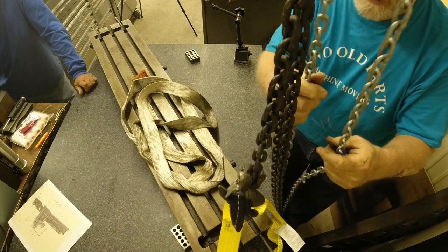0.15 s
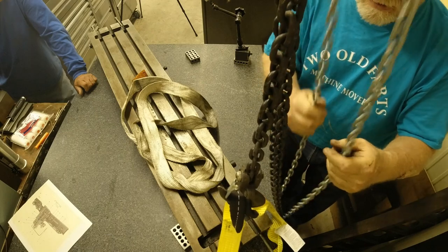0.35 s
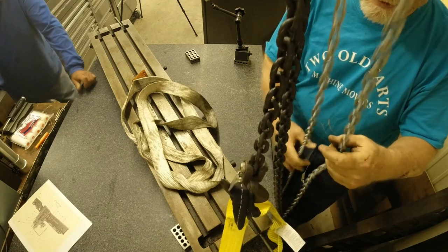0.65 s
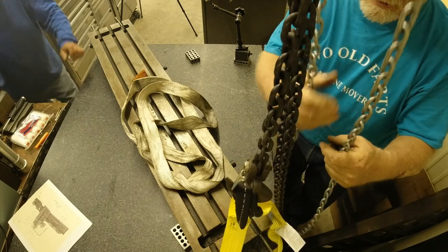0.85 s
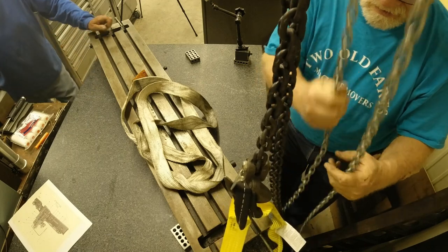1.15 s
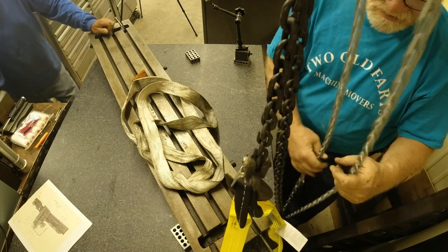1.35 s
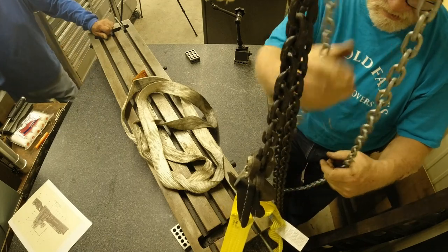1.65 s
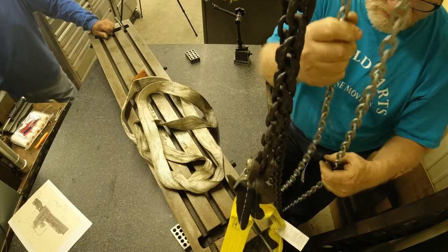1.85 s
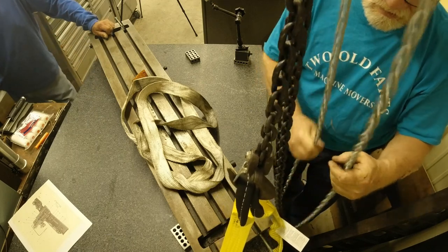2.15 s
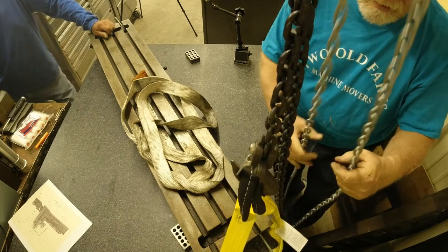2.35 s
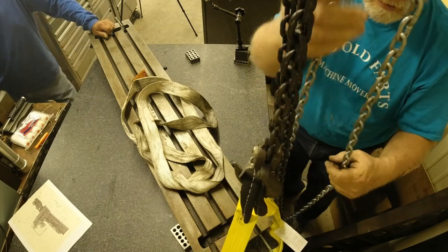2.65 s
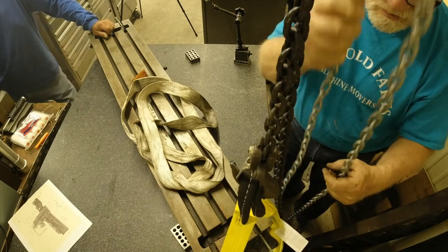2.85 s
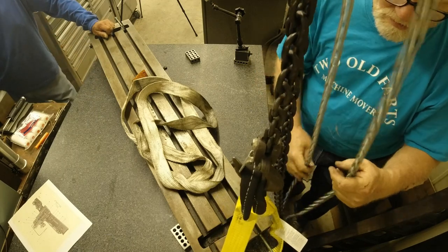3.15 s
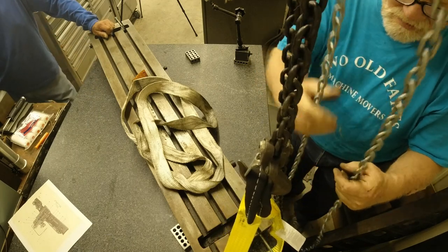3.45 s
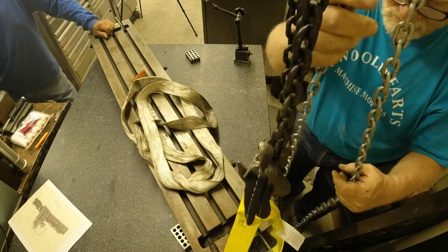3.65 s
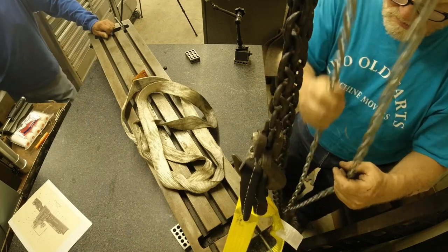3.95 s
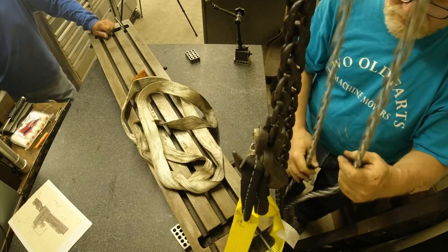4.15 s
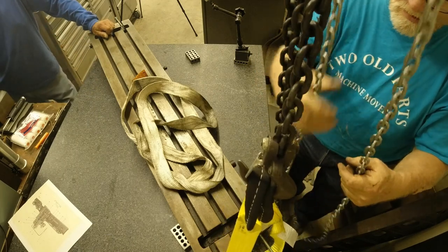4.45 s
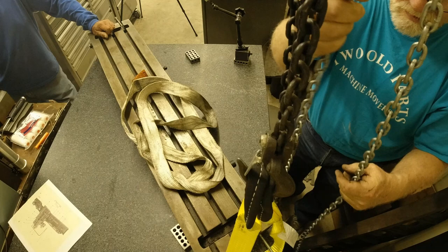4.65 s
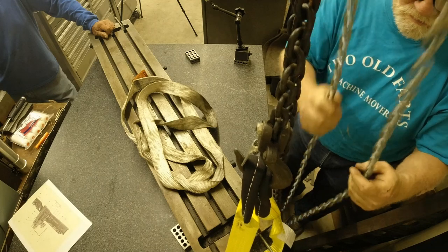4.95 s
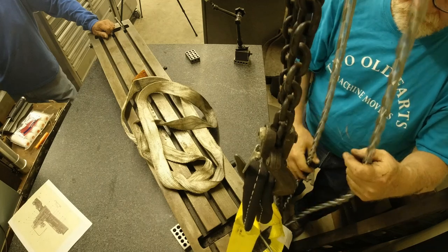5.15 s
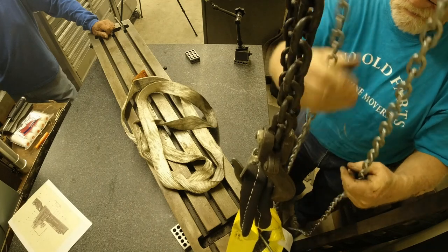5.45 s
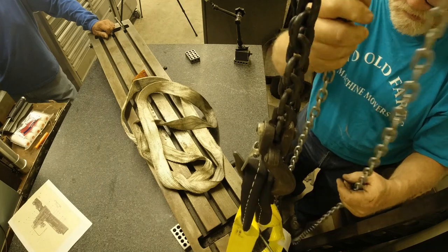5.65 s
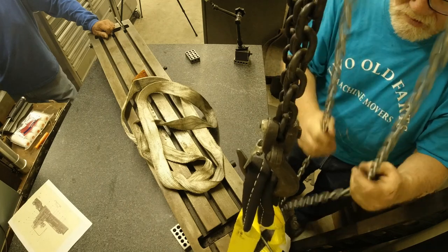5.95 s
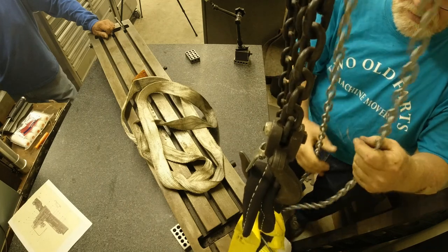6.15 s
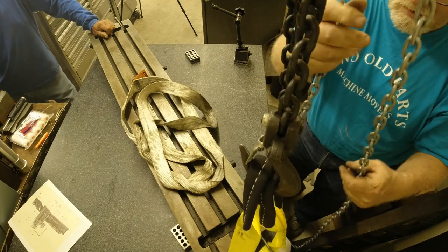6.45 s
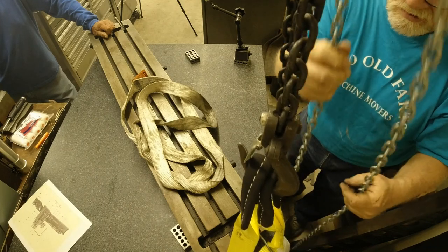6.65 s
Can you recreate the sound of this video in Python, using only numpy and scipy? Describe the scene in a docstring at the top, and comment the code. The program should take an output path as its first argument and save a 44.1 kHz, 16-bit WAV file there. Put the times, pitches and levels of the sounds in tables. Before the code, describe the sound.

A hand chain hoist is pulled steadily in a workshop, heard very close in stereo. The end of a strong clattering pull opens the sound, fading by 0.2 s into loose slaps, clunks and ticks. Further pulls begin near 0.4, 1.2, 2.0, 3.0, 3.9, 4.9 and 5.9 s, each lasting about 0.55 to 0.75 s. Links knock in a dense, irregular stream, ringing short, bright steel tones with a hollow casing note, crisp noise, fine high jingle and soft low rumble. Each surge quickly gathers force, gradually slows and stops sharply. Near silence follows, with single slaps, link clunks and pawl ticks, often clustered as the next pull takes up slack. The pull at 2.0 s chimes most clearly. After a few knocks from 6.3 s, a weaker, duller pull starts at 6.7 s. The room tail is short; faint, bass-heavy workshop noise stays underneath.

```python
"""A hand chain hoist, pulled in even strokes in a workshop, is heard close up at two microphone ports.
Links knock over the hand wheel in a dense irregular stream that rings resonant modes of the steel parts,
with bursts of unpitched noise and a low rumble. Between strokes the chain falls nearly silent and single
slaps, clunks and pawl ticks stand out. Noise-built room reflections add a short tail, and a faint steady
workshop noise lies behind it all."""
import sys
import numpy as np
from scipy import signal
from scipy.fft import rfft, irfft, next_fast_len
from scipy.io import wavfile

SR = 44100
rng = np.random.default_rng(int(sys.argv[2]) if len(sys.argv) > 2 else 0)


def pcm_store(signal):
    """Save signal as 16-bit PCM."""
    levels = np.round(np.clip(np.atleast_2d(signal), -1, 1) * 32767)
    wavfile.write(sys.argv[1], SR, levels.astype(np.int16).T)


N = 298997  # length in samples

# strokes of the arm: start_s, length_s, clatter at full speed level_db, slowing by the end drop_db,
# jingle level_db, hollow cover ring relative_db, chime relative_db, rumble level_db,
# then the chain swinging on afterwards: clatter level_db, jingle level_db
STROKES = [(-.3, 0.5, -16.5, 12, -25.5, 2.3, -2.5, -33.5, -35.5, -36),
           (0.412, 0.6, -19, 7.2, -24, 1.1, -3, -35, -50, -38),
           (1.227, 0.54, -18, 9, -25, 2.9, -.5, -31, -45, -37),
           (2.029, 0.65, -17, 9.8, -24, -0.17, 2.5, -33, -38.5, -41),
           (2.972, .73, -19.5, 8.2, -25, 1.7, -4.5, -31, -49, -51),
           (3.909, 0.74, -19, 9, -24, 1.2, -2, -33.5, -43.5, -47),
           (4.931, 0.683, -19, 9.1, -24.5, 2.6, -4, -32.5, -50, -43),
           (5.867, 0.55, -19, 9.2, -25, 1.7, -1, -33.5, -46, -50),
           (6.714, .6, -24.5, 6.4, -52, -4.5, 0, -32, -49, -52)]
# the hand chain slaps taut or slack: start_s, relative_db
SLAPS = [(.1433, -11), (.2183, -11.5), (.3087, -20), (.417, -12), (1.0824, -11.5), (1.2291, -13.5),
         (1.2646, -9.5), (1.7306, -28), (1.797, -21), (2.0278, -10.5), (2.6374, -24), (2.9739, -11),
         (3.7186, -14), (3.908, -18.5), (3.926, -14), (3.9913, -20), (4.6808, -16), (4.9326, -9.5),
         (5.6027, -26), (5.653, -11.5), (5.8673, -13)]
# a link drops into the hand wheel: start_s, relative_db
CLUNKS = [(.0467, -10), (.0956, -11.5), (.326, -32), (.3617, -20.5), (.4633, -3.5), (1.1968, -22),
          (1.7499, -24), (1.8539, -31), (1.9714, -40), (2.009, -25), (2.0403, -6), (2.6649, -11.5),
          (2.794, -24.5), (2.9465, -18.5), (3.006, -7.5), (3.026, -2.5), (3.8174, -39), (3.9913, -17),
          (4.573, -6.5), (4.807, -35), (4.8648, -44), (4.9995, -2.5), (5.0551, -6), (5.8191, -42),
          (5.8392, -33), (5.923, -7), (6.378, -10), (6.5218, -38), (6.546, -29.5), (6.643, -20),
          (6.7145, -33), (6.7331, -31)]
# the pawl ticks: start_s, relative_db
TICKS = [(0.048, -16), (0.2683, -21.5), (.51, -12), (.585, -16), (1.1094, -30), (1.7499, -20.5),
         (1.8539, -35), (2.0398, -16), (2.709, -19.5), (3.078, -9.5), (3.7174, -35), (3.8174, -40),
         (3.9923, -12), (4.8648, -48), (5.0558, -14), (5.088, -24), (5.5607, -14), (5.923, -12),
         (6.312, -14.5), (6.5218, -32.5), (6.643, -23)]
# modes of the steel housing: pitch_hz, relative_db, t60_s
HOUSING = [(1306, -13.5, 0.068), (1550, -8.5, 0.034), (1729, -12.5, 0.044), (2050, -36, 0.027),
           (2216, -26, 0.11), (2330, -16, 0.098), (2491, -4.5, 0.098), (2528, -2, 0.12),
           (2580, -9.5, 0.055), (2630, -7.5, 0.073), (3100, -40, 0.11), (4376, -12.5, 0.091),
           (5234, -11.5, 0.031), (6080, -18, 0.07)]
# two clear high tones rung along with the housing: pitch_hz, relative_db, t60_s
CHIME = [(3490, 0, 0.064), (3633, 4, 0.16)]
# low, hollow modes of the cover: pitch_hz, relative_db, t60_s
COVER = [(701, 0, 0.12), (732.6, 2, 0.079), (766.8, -1, 0.12), (805, -0.5, 0.065), (863, -5.5, 0.15)]
# modes of the pawl: pitch_hz, relative_db, t60_s
PAWL = [(4015, 0, .06), (4070, -2, .05)]
# high modes of the chain links: pitch_hz, relative_db, t60_s
LINKS = [(7560, -2, .02), (7720, 0, .02), (8350, -3, .02), (8520, -2, .02), (10150, -7, .01),
         (13000, -9, .008)]
# spectrum of the unpitched part of each knock: pitch_hz, relative density_db_per_hz
CRACK = [(600, -36), (1000, -15.5), (2000, 1.5), (4500, 1), (6200, -4.5), (7000, -10.5)]
# spectrum of the unpitched hiss of the light contacts: pitch_hz, relative density_db_per_hz
FIZZ = [(5000, -6), (6500, -6.5), (7200, -6), (8000, 0), (12000, 1), (16000, -2)]
# spectrum of the low rumble under the strokes: pitch_hz, relative density_db_per_hz
RUMBLE = [(25, -21), (70, -9), (100, 2), (300, 2.5), (600, 2.5), (1100, -35), (1600, -16)]
# spectrum of the workshop background: pitch_hz, relative density_db_per_hz
SHOP = [(25, -0.5), (45, -13), (65, -8), (90, -12), (130, -25), (400, -20), (800, -27), (6000, -31),
        (15000, -50)]

# energy each kind of knock passes to housing, cover, pawl, links (dB)
SLAP_RINGS = (-37.5, -46.5, -46.5, -37.5)
CLUNK_RINGS = (-38, -39, -48, -47)
TICK_RINGS = (-54, -45, -29, -66)

RISE_S, RISE_DB = .11, 11.5  # the chain gathers speed
SLOWING_POWER, JINGLE_SLOWING_DB = 1.8, 4.5
TAKE_UP_DB, TAKE_UP_DB_PER_S = 7.5, 305  # before the start of a stroke
STOP_DB_PER_S = 412  # after its end
SETTLE_DB_PER_S, JINGLE_SETTLE_DB_PER_S = 64, 116  # the chain swings on
SHOP_DB = -64
TOP_HZ = 15850


def hoist():
    """One stream of contacts shakes housing, cover and pawl, a lighter one the links; pulling sets strength."""
    pull_db, jingle_db = pulling()
    start, length, _, _, _, boom_db, chime_db, *_ = np.transpose(STROKES)
    t, middle = np.arange(N) / SR, start + length / 2
    boom_db = np.interp(t, middle, boom_db)
    chime_db = np.interp(t, middle, chime_db)

    busy = np.clip(undb(pull_db + 21), .5, 1)
    contacts = stream(per_s=260., scatter_db=1.0, busy=busy)
    wheel = contacts * undb(pull_db) ** 2
    # the hand chain chatters faster
    slack = stream(per_s=600.0, scatter_db=0.0, busy=busy) * undb(jingle_db) ** 2
    hard, hollow, tick, light = knocks(bounce_s=.0022, loss_db=2.0)

    housing = undb(-2) * ring(HOUSING, wheel, hard, spot_db=4.0, alike=0.86)
    chime = undb(chime_db - 8.0) * ring(CHIME, wheel, hard, spot_db=2.5, alike=0.25)
    cover = ring(COVER, wheel * undb(boom_db - 5.0) ** 2, hollow, spot_db=3.5, alike=0.98)
    pawl = ring(PAWL, wheel * undb(-9.5) ** 2, tick, spot_db=9.0, alike=0.24)
    links = undb(-4.5) * ring(LINKS, slack, light, spot_db=3.5, alike=0.053)

    crack_envelope = burst(wheel + hard, rise_s=.008, t60_s=.075)
    crack = undb(-1) * crack_envelope * coloured(CRACK, alike=0.52)
    fizz_envelope = burst(slack + light, rise_s=0.038, t60_s=0.069)
    fizz = undb(1.33) * fizz_envelope * coloured(FIZZ, alike=0.021)

    # small steel parts radiate no bass
    no_bass = signal.butter(4, 560., "high", fs=SR, output="sos")
    steel = signal.sosfilt(no_bass, housing + chime + cover + pawl + links + crack)
    return steel + fizz + rumble(contacts)


def pulling():
    """Clatter and jingle dB: each stroke takes up slack, gathers speed, slows, stops, leaves the chain swinging."""
    columns = np.transpose(STROKES)[:, :, None]
    start, length, full_db, slow_db, jingle_db, *_, swing_db, rustle_db = columns
    t = np.arange(N) / SR - start
    before, after = np.maximum(-t, 0), np.maximum(t - length, 0)

    shape_db = -RISE_DB * np.clip(1 - t / RISE_S, 0, 1)
    shape_db = shape_db - (t < 0) * TAKE_UP_DB - TAKE_UP_DB_PER_S * before
    shape_db = shape_db - STOP_DB_PER_S * after
    slowing = np.clip(t / length, 0, 1) ** SLOWING_POWER

    swing = np.where(after > 0, swing_db - SETTLE_DB_PER_S * after, -np.inf)
    rustle = np.where(after > 0, rustle_db - JINGLE_SETTLE_DB_PER_S * after, -np.inf)
    clatter = np.maximum(full_db - slow_db * slowing + shape_db, swing)
    jingle = np.maximum(jingle_db - JINGLE_SLOWING_DB * slowing + shape_db, rustle)
    # the strongest stroke prevails at each moment
    return clatter.max(axis=0), jingle.max(axis=0)


def stream(per_s, scatter_db, busy):
    """Energy of random link contacts; busy under 1 leaves that share strong and the rest very faint."""
    hit, size, turn = rng.random((3, N))
    extra_db = scatter_db * np.minimum(-np.log(1 - size), 4)  # mostly small, a few harder
    blows = (hit < per_s / SR) * undb(extra_db) ** 2
    return blows / blows.mean() * np.where(turn < busy, 1 / busy, 1e-3)


def knocks(bounce_s, loss_db):
    """Energy of the single knocks in each part of the hoist: a blow and five weaker bounces."""
    rows = np.array(SLAPS + CLUNKS + TICKS)
    counts = [len(SLAPS), len(CLUNKS), len(TICKS)]
    rings_db = np.repeat([SLAP_RINGS, CLUNK_RINGS, TICK_RINGS], counts, axis=0)
    order = np.arange(6)
    blows = np.zeros((len(SLAP_RINGS), N))
    late_s = bounce_s * order * (.5 + rng.random((len(rows), len(order))))
    at = ((rows[:, :1] + late_s) * SR).astype(int)
    for part, db in zip(blows, (rows[:, 1:] + rings_db).T):
        np.add.at(part, at, SR * undb(db[:, None] - loss_db * order) ** 2)
    return blows


def ring(modes, rattle, single, spot_db, alike):
    """Decaying resonances rung by the rattle and by the single knocks, whose strength scatters only 1 dB."""
    out, total = 0, np.sqrt(np.sum(undb([m[1] for m in modes]) ** 2))
    for hz, db, t60_s in modes:
        force = strike(rattle, spot_db, alike) + strike(single, 1.0, alike)
        r = np.exp(-np.log(1000) / (t60_s * SR))
        gain = undb(db) / total * np.sqrt(1 - r)  # unit power for unit force
        poles = [1, -2 * r * np.cos(2 * np.pi * hz / SR), r * r]
        out = out + gain * signal.lfilter([1, 0, -1], poles, force)
    return out


def strike(blows, spot_db, alike):
    """Force on one mode: every blow lands at another spot, so it has its own chance weight and sign."""
    at, force = np.flatnonzero(blows), np.zeros((2, N))
    chance = rng.standard_normal((len(at), 3)).T
    weight = undb(spot_db * chance[0])
    weight = weight / np.sqrt(np.mean(weight ** 2))
    force[:, at] = ports(*np.sign(chance[1:]), alike) * np.sqrt(blows[at]) * weight
    return force


def burst(blows, rise_s, t60_s):
    """Envelope of the unpitched noise that each blow sets off: two decays in a row soften its onset."""
    return np.sqrt(fade(fade(blows, rise_s), t60_s))


def rumble(contacts):
    """Low noise, unlike at the two ports, swells and sinks with the chain speed of each stroke."""
    t, gain = np.arange(N) / SR, 0
    for start, length, *_, db, _, _ in STROKES:
        progress = np.clip((t - start) / (0.94 * length), 0, 1)
        gain = gain + undb(db) * np.sin(np.pi * progress) ** 1.7
    return gain * burst(contacts, rise_s=0.032, t60_s=0.032) * coloured(RUMBLE, alike=0.033)


def fade(power, t60_s):
    """Lets each spike of power die away, keeping its energy."""
    p = np.exp(-2 * np.log(1000) / (t60_s * SR))
    return signal.lfilter([1 - p], [1, -p], power)


def coloured(shape, alike):
    """Noise at the two ports with the given spectrum."""
    hz, db = np.transpose(shape)
    size = next_fast_len(N, True)
    log_hz = np.log(np.maximum(np.arange(size // 2 + 1) * SR / size, 1))
    gain = undb(np.interp(log_hz, np.log(hz), db))
    spectrum = rfft(rng.standard_normal((2, size))) * gain
    mid, side = unit(irfft(spectrum, size)[:, :N])
    return ports(mid, side, alike)


def ports(mid, side, alike):
    """Left and right from two unrelated signals; alike = 1 makes them equal."""
    alike = np.clip(alike, 0, 1)
    opposed = side * np.array([[1], [-1]])
    return np.sqrt((1 + alike) / 2) * mid + np.sqrt((1 - alike) / 2) * opposed


def undb(db):
    """Amplitude factor for a level in dB."""
    return 10 ** (np.asarray(db) / 20)


def unit(x):
    """Scales to an rms of 1."""
    return x / np.sqrt(np.mean(x ** 2))


def room(dry, t60_s, treble_t60_s, wet_db):
    """Walls and benches return a short tail that loses its treble first."""
    t = np.arange(SR // 2) / SR
    dull = signal.lfilter([.3], [1, -.7], rng.standard_normal((2, len(t))))
    bright = .5 * rng.standard_normal((2, len(t)))
    tail = dull * undb(-60 * t / t60_s) + bright * undb(-60 * t / treble_t60_s)
    build_up = np.minimum(t / 0.017, 1)
    tail = tail * build_up / np.sqrt(np.sum(tail ** 2) / 2)
    return dry + undb(wet_db) * signal.fftconvolve(dry, tail, axes=1)[:, :N]


def shop():
    """Faint steady noise of the workshop, strongest in the bass and largely unlike at the two ports."""
    return undb(SHOP_DB) * coloured(SHOP, alike=.1)


def scene():
    """The hoist in its room, over the workshop background."""
    return room(hoist(), t60_s=0.24, treble_t60_s=0.03, wet_db=-17.5) + shop()


def record(dry):
    """The left port hears two samples later; the loudest peaks are rounded and the top is cut."""
    late = np.array([np.roll(dry[0], shift=2), dry[1]])
    rounded = 1.5 * np.tanh(late / 1.5)
    top_cut = signal.ellip(10, .2, 70, TOP_HZ, fs=SR, output="sos")
    return signal.sosfilt(top_cut, rounded)


dry = scene()
out = record(dry)
pcm_store(out)
```